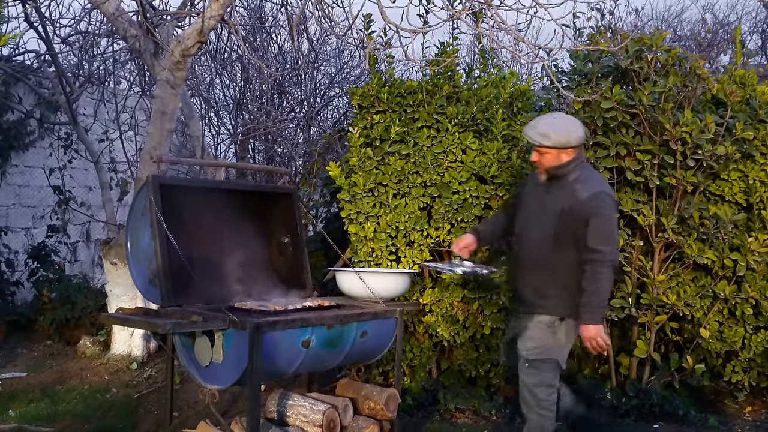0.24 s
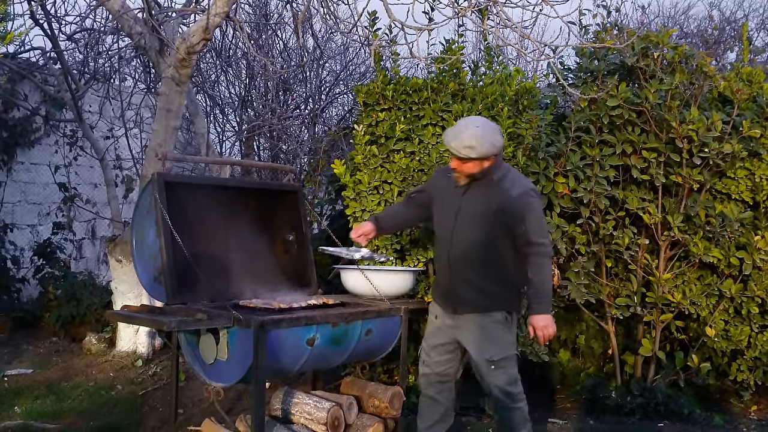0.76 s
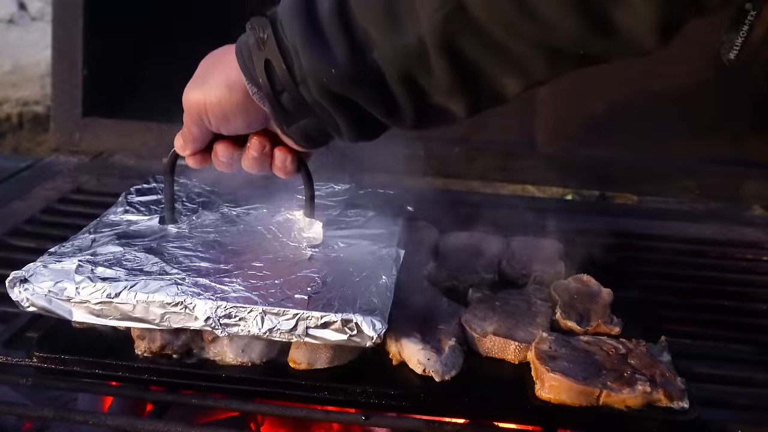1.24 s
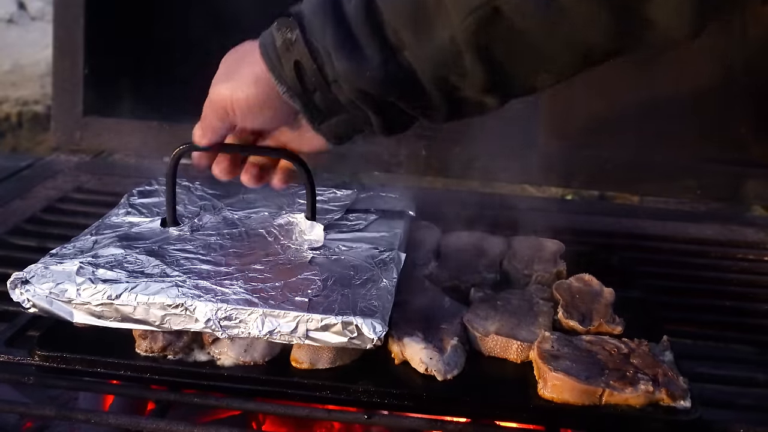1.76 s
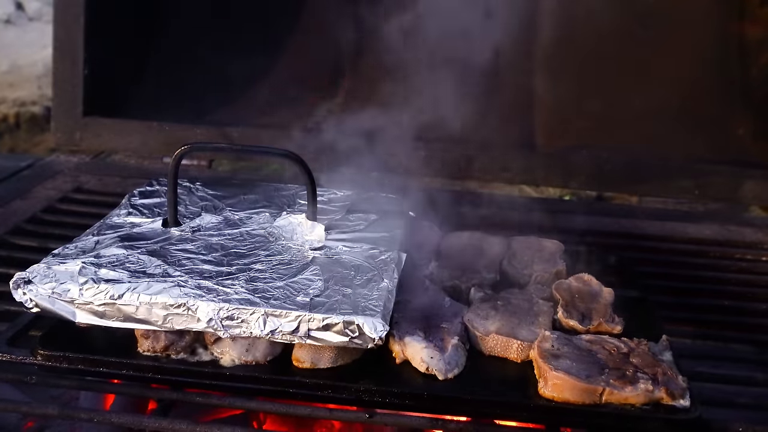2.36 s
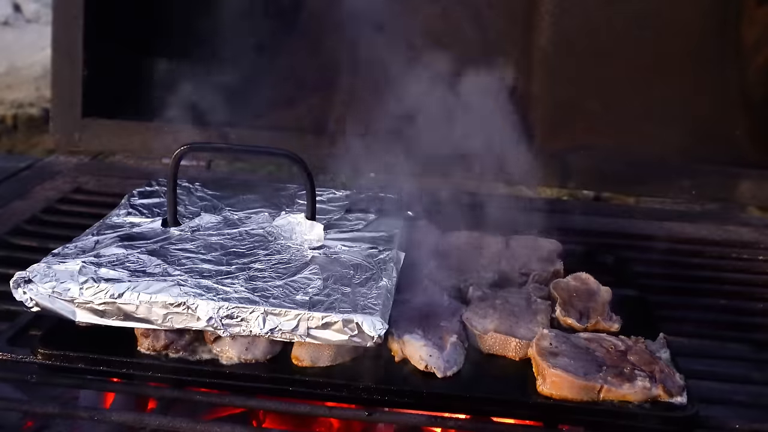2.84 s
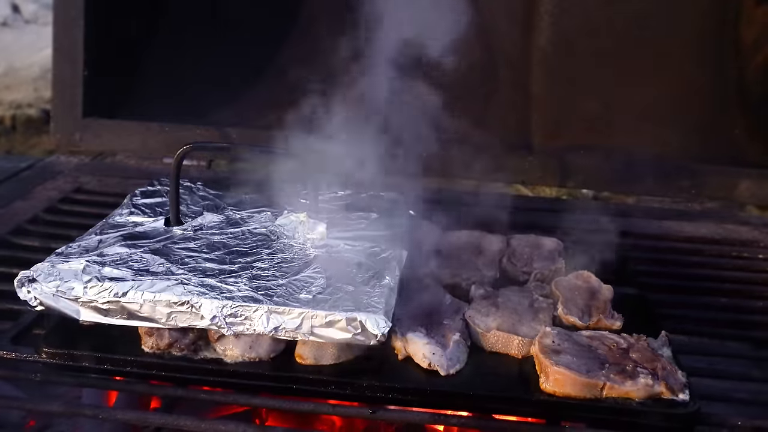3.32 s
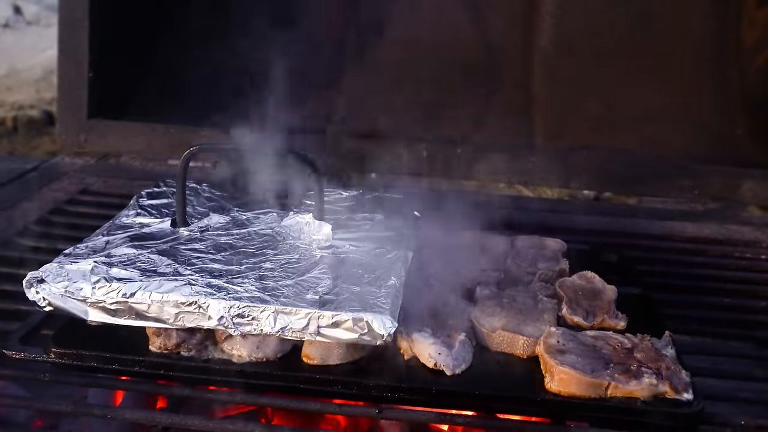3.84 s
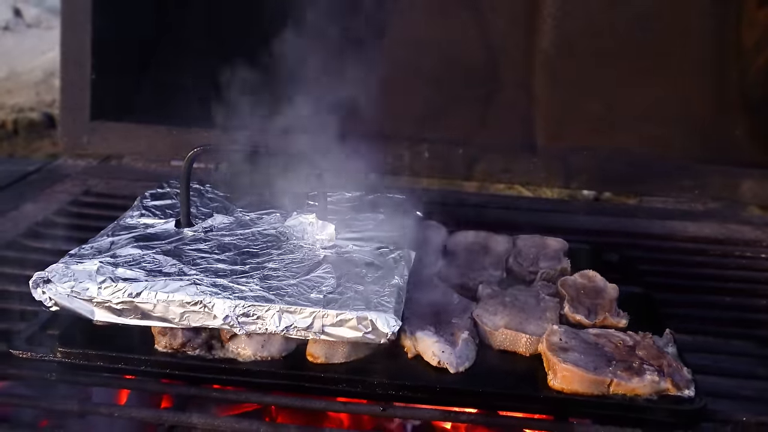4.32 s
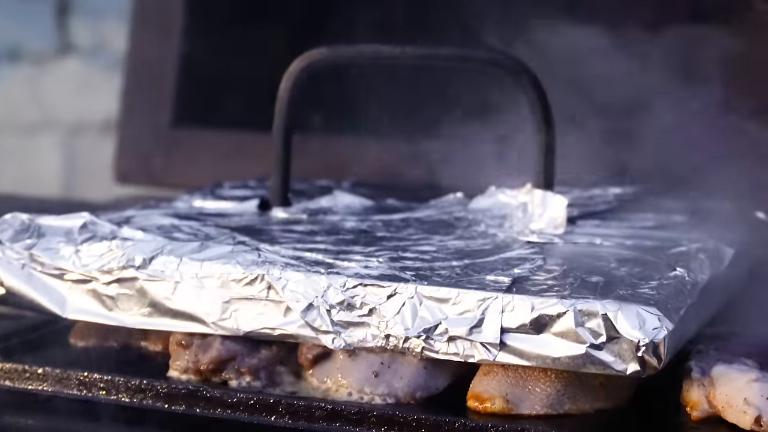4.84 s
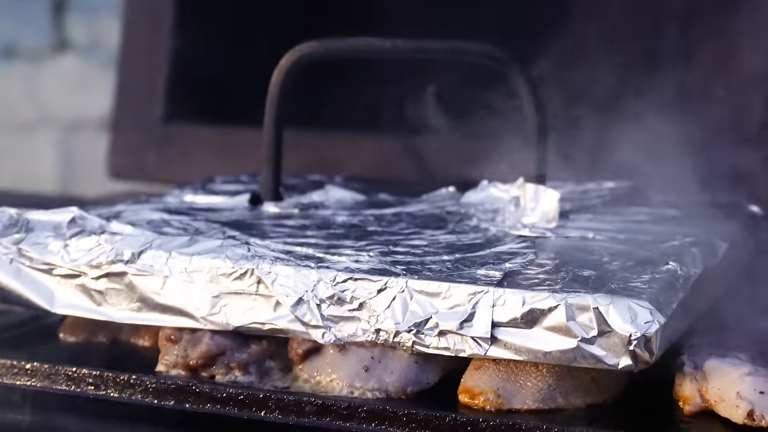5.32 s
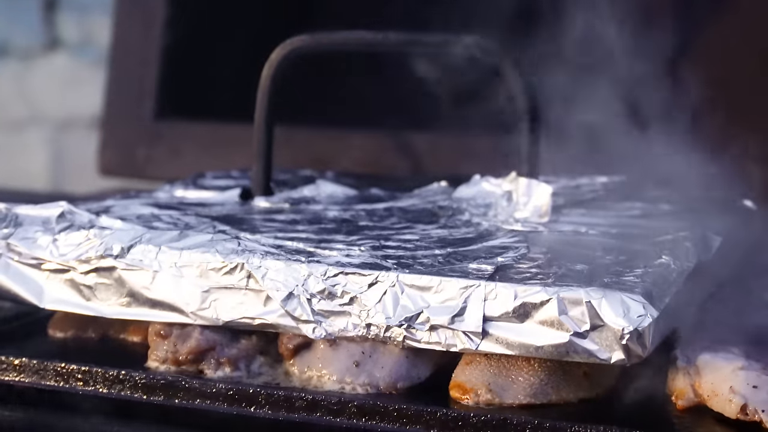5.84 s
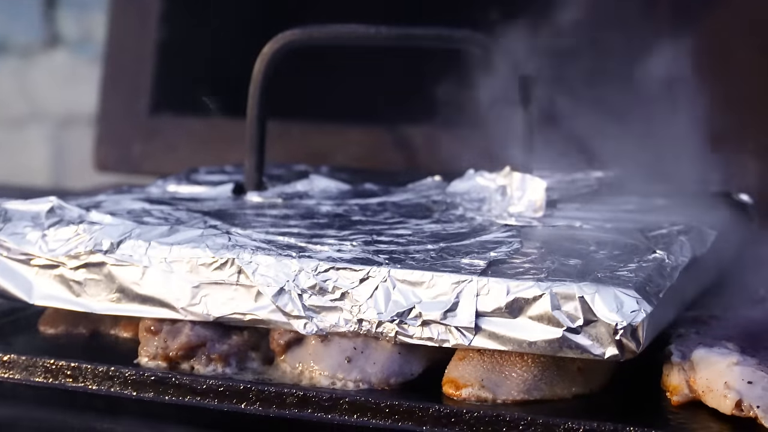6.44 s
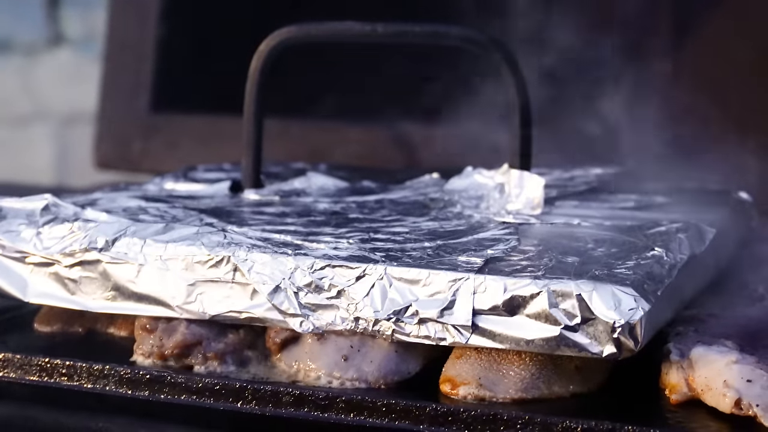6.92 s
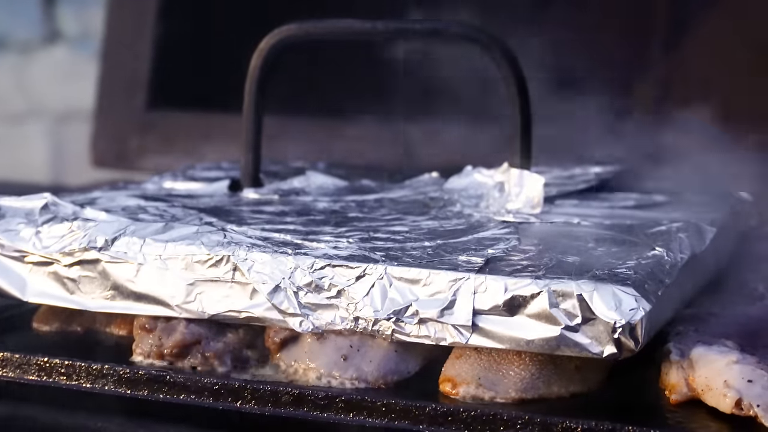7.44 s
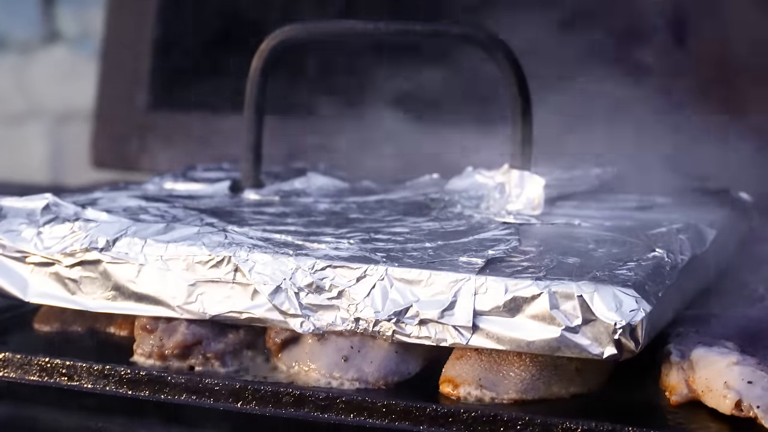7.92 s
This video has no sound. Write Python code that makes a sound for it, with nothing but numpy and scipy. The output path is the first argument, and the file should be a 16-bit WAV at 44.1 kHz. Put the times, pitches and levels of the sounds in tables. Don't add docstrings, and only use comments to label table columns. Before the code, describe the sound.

Outdoors, the first half second is quiet: a weak, distant sizzle over a soft low murmur. From about 0.6 s it swells fast, and by 1.3 s a close, bright, crisp frying hiss fills the foreground. At 1.1 s a press settles on the meat, thickening the mid tones and adding a barely audible narrow hum until about 3.9 s. A cluster of hard snaps comes at 1.3 to 1.6 s, and a very loud double crack at 2.8 s. Muffled thuds and drum blows gather around 3 to 3.7 s. From 4.7 s the perspective is closer and slightly softer, with frequent dry spits, ticks and pops, notably at 5.1, 5.6, 6.2 to 7 and 7.2 to 7.5 s, a few knocking the hollow steel. Around 8 s a low, soft flare roar rises beneath. Single close microphone, loud pops briefly ducking and clipping.

```python
import sys
import numpy as np
from scipy import signal
from scipy.fft import rfft, irfft
from scipy.io import wavfile
from scipy.ndimage import uniform_filter1d, map_coordinates

SR = 44100
rng = np.random.default_rng(int(sys.argv[2]) if len(sys.argv) > 2 else 0)


def gain_from_db(level_db):
    decades = np.asarray(level_db, float) / 20
    return 10 ** decades


def persist_wave(psi):
    counts = np.round(np.clip(psi, -1, 1) * 32767).astype(np.int16)
    wavfile.write(sys.argv[1], SR, np.atleast_2d(counts).T)


N = 360297

# time [s], sizzle level [dB].
BOIL = [(0, -41), (.37, -42.5), (.6, -39), (.85, -31.5), (1.13, -26.5), (1.3, -24.5), (2.07, -24),
        (2.6, -25), (2.95, -26), (3.73, -24.5), (4.36, -27), (4.66, -26), (5.2, -27), (5.77, -26),
        (6.07, -27), (6.6, -27), (7.6, -28), (8.17, -29.5)]
# frequency [Hz], gain [dB].
CRACK_SPECTRUM = [(30, -54), (300, -23), (1200, -1.5), (2500, -0.5), (6500, 3), (9000, -0.5), (17000, -13)]
PRESS_S, PRESS_RISE_S = 1.11, 0.055


def unit(x):
    return x / np.sqrt(np.mean(x ** 2) + 1e-20)


def curves(rows):
    s, *cols = np.transpose(rows)
    return [np.interp(np.arange(N) / SR, s, c) for c in cols]


def wobble(rate_hz):
    knots = rng.standard_normal(int(N * rate_hz / SR) + 4)
    return map_coordinates(knots, [np.arange(N) * rate_hz / SR])


def step(s, rise_s):
    return (1 + np.tanh((np.arange(N) / SR - s) / rise_s)) / 2


def coloured(x, points):
    size = 2 ** 13
    f, db = np.transpose(points)
    hz = np.fft.rfftfreq(size, 1 / SR)
    gain = gain_from_db(np.interp(np.log(hz + 1), np.log(f + 1), db))
    cepstrum = irfft(np.log(gain))
    cepstrum[1:size // 2] *= 2
    cepstrum[size // 2 + 1:] = 0
    impulse = irfft(np.exp(rfft(cepstrum)))[:size // 2]
    return signal.fftconvolve(x, impulse)[:N]


def peak(points):
    return np.abs(coloured(np.arange(N) == 0, points)).max()


def garden():
    # frequency [Hz], level [dB per Hz].
    murmur = [(15, -6), (25, -6), (60, -8), (110, -16), (200, -10), (300, -12), (345, -1), (420, -10),
              (1000, -42)]
    # time [s], level [dB].
    far_level = [(0, -67), (.6, -62.5), (1.3, -74), (8.17, -90)]
    level_db = curves(far_level)[0] + 2 * wobble(3.8)
    return gain_from_db(level_db) * unit(coloured(rng.standard_normal(N), murmur))


def fire():
    # frequency [Hz], level [dB per Hz].
    rumble = [(15, -10), (25, 7.5), (50, -10), (110, 1.5), (200, -4.5), (400, -21)]
    # frequency [Hz], level [dB per Hz].
    flare = [(20, -40), (100, -19), (190, -2), (300, -2), (500, -3), (900, -5), (3000, -53)]
    embers_db, flare_s, flare_rise_s, flare_db = -69.5, 8.0, 0.089, -44
    draught_db = embers_db + 1.9 * wobble(3.61) + 1.5 * wobble(8.7)
    embers = gain_from_db(draught_db + 2.5) * unit(coloured(rng.standard_normal(N), rumble))
    roar = step(flare_s, flare_rise_s) * gain_from_db(flare_db + 2.5 * wobble(25))
    return embers + roar * unit(coloured(rng.standard_normal(N), flare))


def note():
    note_hz, width_hz, note_db, end_s = 778, 18, -55, 3.87
    b, a = signal.iirpeak(note_hz, note_hz / width_hz, SR)
    ring = unit(signal.lfilter(b, a, rng.standard_normal(N)))
    gate = step(PRESS_S, PRESS_RISE_S) * (1 - step(end_s, 0.2))
    return gain_from_db(note_db + 2.5 * wobble(6)) * ring * gate


def knocks():
    # time [s], frequency [Hz], level [dB], decay by 60 dB [s].
    drum_knocks = [(3.091, 130, -44, .05), (3.639, 258, -31, 0.06), (4.21, 60, -50, .04), (6.63, 260, -44, 0.13),
                   (6.981, 278, -29.5, 0.067), (6.99, 424, -42, 0.48), (7.212, 50, -36, 0.037),
                   (7.2135, 595, -23, 0.0074), (7.2127, 1470, -10, 0.0098), (7.369, 141, -38, 0.051),
                   (7.37, 260, -36, 0.056)]
    t = np.arange(SR // 4) / SR
    out = np.zeros(N + SR)
    for s, hz, db, t60_s in drum_knocks:
        drift = np.cumsum(0.032 * rng.standard_normal(len(t)))
        ring = np.sin(2 * np.pi * hz * t + drift)
        attack = 1 - np.exp(-t / 0.0011)
        out[round(s * SR):][:len(t)] += gain_from_db(db - 60 * t / t60_s) * ring * attack
    return out[:N]


def ticks():
    # time [s], peak [dB].
    clear_ticks = [(1.0843, -6), (1.362, -7.9), (1.3996, -9), (1.5105, -8.0), (1.7771, -7.3),
                   (2.2931, -7.1), (2.434, -10), (2.4772, -10), (4.1822, -8.6), (4.2538, -8.7),
                   (4.9809, -9.6), (4.9955, -8.2), (5.1712, -6), (5.3315, -10), (5.4413, -12), (5.588, -5),
                   (5.6766, -9.3), (5.8588, -9.6), (5.8686, -9.0), (6.0794, -8.1), (6.2957, -6),
                   (6.4812, -6), (6.5792, -12), (6.636, -7.4), (6.6798, -12), (6.7458, -9.5),
                   (6.9563, -8.1), (6.9763, -8.4), (7.5624, -4), (7.8639, -10.6)]
    # frequency [Hz], gain [dB].
    spectrum = [(30, -70), (1000, -17), (3000, -1), (7000, 1), (11000, -4), (17000, -13)]
    gain_db, rate_hz, over_sizzle_db, scatter_db = -0.5, 30, 10, 2.5
    size_db = curves(BOIL)[0] + over_sizzle_db + np.minimum(scatter_db * rng.exponential(1, N), 9)
    spikes = (rng.random(N) < rate_hz / SR) * gain_from_db(size_db)
    s, db = np.transpose(clear_ticks)
    spikes[np.round(s * SR).astype(int)] = gain_from_db(db + gain_db)
    return coloured(spikes * rng.choice([-1, 1], N), spectrum) / peak(spectrum)


def cracks():
    # time [s], low ring [Hz], its level [dB], high ring [Hz], its level [dB].
    bursts = [(2.8208, 2780, -4, 3900, -6), (2.8239, 2150, 0, 6650, -15), (2.9298, 2500, -16, 3500, -11),
              (2.9337, 1700, -16, 3500, -15), (3.841, 2560, -13, 5800, -8), (4.211, 3300, -17, 5170, -7),
              (4.4036, 2500, -18, 6200, -12), (4.6496, 2020, -15.5, 4290, -18),
              (4.8368, 2320, -8, 6370, -19), (5.1497, 1510, -16, 4200, -11), (5.9325, 2350, -18, 4560, -9),
              (5.981, 2650, -16, 4850, -18), (6.229, 2500, -10, 4850, -9), (7.2135, 2370, -7.5, 5600, -13),
              (7.3677, 1200, -21, 5070, -9.5), (7.375, 2190, -8.5, 5200, -16),
              (7.5032, 2800, -11.5, 5240, -21), (7.901, 2600, -7, 5600, -7.5),
              (7.9046, 2400, -11, 6100, -15), (8.1236, 3450, -13.5, 5400, -9)]
    life_cycles = 3.1
    t = np.arange(SR // 4) / SR
    out = np.zeros(N + SR)
    for s, low_hz, low_db, high_hz, high_db in bursts:
        mean_hz = np.average([low_hz, high_hz], weights=gain_from_db([low_db, high_db]))
        life_ms = life_cycles * 1e3 / mean_hz
        hold = np.exp(-(t / (0.0013 * life_ms)) ** 2)
        tail = 0.1 * np.exp(-t / 0.0026) * rng.standard_normal(len(t))
        low = gain_from_db(low_db) * (hold * np.sin(2 * np.pi * low_hz * t) + tail)
        drift = np.cumsum(0.36 * rng.standard_normal(len(t)))
        high = gain_from_db(high_db) * hold * np.sin(2 * np.pi * high_hz * t + drift)
        out[round(s * SR):][:len(t)] += low + high
    return coloured(out[:N], CRACK_SPECTRUM)


def bubbles():
    # time [s], peak [dB], ring [Hz], thump [dB].
    fat_pops = [(.8998, -10, 3490, -32), (1.2803, -5, 1970, -30), (1.3094, 0, 2320, -28),
                (1.3448, -4, 3070, -37), (1.4426, -3, 2780, -32), (2.3085, -15, 3600, -31),
                (2.798, -4, 2130, -22), (2.8202, 0, 2470, -15), (2.9367, -15, 2990, -30),
                (2.993, -17, 3280, -21), (3.114, -5, 3300, -34), (3.642, -7, 2940, -32),
                (3.6692, -5, 3100, -24), (4.2599, -5, 6200, -31), (4.535, -8, 3860, -30),
                (4.7185, -4.5, 2530, -29), (4.773, -4, 4530, -33), (4.995, -16, 5140, -37),
                (5.1536, -2.5, 3540, -30), (5.5256, -4.5, 3620, -29), (5.9476, -7, 5500, -36),
                (6.498, -4.5, 2980, -34), (6.6354, -3, 4820, -28.5), (6.8318, -6, 2430, -25),
                (6.8341, -3.5, 3090, -37), (6.9368, -6, 3810, -34), (7.372, -6, 7500, -34),
                (7.5032, -8, 2620, -39), (7.884, -6, 3000, -29), (6.6315, -10, 4530, -40)]
    # time [s], peak [dB], ring [Hz].
    spits = [(3.99, -4.5, 3000), (1.581, -3, 5370), (2.273, -7, 4030), (2.6139, -8, 5130),
             (2.947, -11, 2640), (4.0716, -4, 4750), (4.2005, -6, 3560), (4.2533, -10, 3400),
             (4.4085, -5, 6000), (5.05, -9, 3940), (7.291, -13, 5500), (4.59, -8, 5200), (5.663, -5, 3800),
             (5.7596, -8, 3020), (5.845, -7, 4150), (5.977, -11, 3720), (7.2882, -12, 7000),
             (6.232, -4, 3250), (6.3695, -4.5, 3590), (6.3747, -5, 3670), (6.544, -11, 3670),
             (6.509, -6, 4700), (6.7113, -6.5, 5170), (6.9165, -6, 5100), (7.063, -7, 3960),
             (7.577, -7, 4980), (7.7049, -5.5, 4700), (7.888, -3, 5000), (7.978, -9, 5150),
             (8.0217, -9, 3990)]
    # time [s], thump [dB].
    thuds = [(.4955, -44), (.7078, -31), (1.1782, -36), (1.406, -36), (2.072, -26), (2.6383, -28.5),
             (2.93, -26), (2.9328, -25), (3.0555, -31), (3.2178, -26), (3.263, -26), (3.432, -26.5),
             (3.6381, -27), (4.182, -25), (7.279, -34), (4.625, -26.5), (4.6467, -26), (4.8365, -32),
             (5.1498, -27), (5.6862, -32), (5.981, -21.5), (5.9846, -31), (6.2108, -32), (6.445, -34),
             (6.981, -28), (7.2137, -29), (7.368, -23.5), (7.3808, -35), (7.905, -27), (8.1242, -19.5)]
    pop_cycles, spit_cycles, thud_cycles = 0.72, 0.88, 1.1
    spit_thump_db, thud_hz, thud_over_db = -41, 3000, 5
    rows = [(s, db, hz, thump_db, pop_cycles * 1e3 / hz) for s, db, hz, thump_db in fat_pops]
    rows += [(s, db, hz, spit_thump_db, spit_cycles * 1e3 / hz) for s, db, hz in spits]
    for s, thump_db in thuds:
        crack_db = min(thump_db + thud_over_db, -17)
        rows.append((s, crack_db, thud_hz, thump_db, thud_cycles * 1e3 / thud_hz))
    return np.transpose(rows)[:, :, None]


def pops():
    # frequency [Hz], gain [dB].
    thump = [(20, -45), (120, -14.5), (200, -8.5), (258, 2.5), (330, -6), (430, 2.5), (700, 2.5),
             (1200, 1.5), (3000, -13)]
    # frequency [Hz], gain [dB].
    snap = [(30, -70), (1000, -14), (2500, 0), (8000, 0), (11000, -9), (17000, -13)]
    t = np.arange(512) / SR
    s, db, hz, thump_db, life_ms = bubbles()
    at = np.round(s * SR).astype(int)
    shape = (len(s), len(t))

    def placed(waves):
        return np.bincount((at + np.arange(len(t))).ravel(), waves.ravel(), N + SR)[:N]

    fade = np.exp(-t / (0.00079 * life_ms))
    ring = 0.89 * np.sin(2 * np.pi * hz * t) * fade
    splatter = 0.28 * rng.standard_normal(shape) * fade ** 0.15 * np.minimum(life_ms / 0.48, 1)
    crack = placed(gain_from_db(db) * (ring + splatter))
    push = rng.standard_normal(shape) * np.exp(-t / 0.0029) + 11 * (t == 0)
    push /= np.linalg.norm(push, axis=1, keepdims=True)
    blows = placed(gain_from_db(thump_db + 15.0) * push)
    front = 0.8 * (1 - np.minimum(life_ms, 0.7)) * gain_from_db(db)
    fronts = np.bincount(at.ravel(), front.ravel(), N)
    out = coloured(crack, CRACK_SPECTRUM)
    out = out + coloured(blows, thump) / peak(thump)
    return out + coloured(fronts, snap) / peak(snap)


def levels():
    open_db, closed_db, dries_db_per_s = -8.5, -4.5, 0.57
    drum_far_db, drum_open_db, drum_pressed_db, drum_fades_db_per_s = -57, -24.5, -20, 0.74
    fizz_db, = curves(BOIL)
    pressed = step(PRESS_S, PRESS_RISE_S)
    since_s = np.maximum(np.arange(N) / SR - PRESS_S, 0)
    cavity_db = fizz_db + open_db + pressed * (closed_db - open_db) - dries_db_per_s * since_s
    drum_db = fizz_db + drum_open_db + pressed * (drum_pressed_db - drum_open_db)
    drum_db = np.maximum(drum_db - drum_fades_db_per_s * since_s, drum_far_db)
    return fizz_db, cavity_db, drum_db


def sizzle():
    # time [s], steady share of the sizzle [0-1], size scatter [dB], spray [dB].
    seats = [
        (0, 0.52, 3.5, -7),
        (.58, 0.43, 3.5, -7),
        (.7, 0.59, 5, -6.5),
        (4.6, 0.61, 5, -7),
        (4.8, 0.6, 4.5, -7),
        (8.17, 0.39, 6, -7),
    ]
    # frequency [Hz], level [dB per Hz].
    film_spectrum = [(30, -84), (1000, -36), (2500, -7.5), (3500, -4), (5000, -1.5), (6800, -0.5),
                     (7800, -2), (9000, -12), (12000, -32.5)]
    spray_spectrum = [(30, -90), (4000, -31), (8000, -5.5), (9500, 0.5), (12500, -4.5), (13700, -9.5),
                      (14800, -5.5), (17000, -3.5)]
    cavity_spectrum = [(30, -96), (500, -40.5), (1100, -11), (1800, -5.5), (2600, 0.5), (3000, -3),
                       (3600, -17.5), (6000, -22)]
    drum_spectrum = [(20, -54), (120, -18.5), (200, -13.5), (258, -1.5), (320, -8), (430, -5), (480, -3),
                     (570, 1.5), (710, -1.5), (780, 1.5), (900, -3), (1400, -3.5), (3000, -30)]
    fizz_db, cavity_db, drum_db = levels()
    steady, scatter_db, spray_db = curves(seats)
    clumps = gain_from_db(1.2 * wobble(30) + 3 * wobble(170))
    bursts = rng.random(N) < 2000 / SR * clumps
    size_db = scatter_db * rng.exponential(1, N)
    share = np.clip(steady, 0, 1)

    def body(points, own_db, swell_db):
        click_db = np.minimum(size_db + own_db * rng.standard_normal(N), 20)
        clicks = unit(bursts * gain_from_db(click_db))
        hiss = unit(rng.standard_normal(N) * clumps ** 0.047 * gain_from_db(swell_db * wobble(20)))
        return unit(coloured(np.sqrt(1 - share) * clicks + np.sqrt(share) * hiss, points))

    film = gain_from_db(fizz_db - 0.92) * body(film_spectrum, own_db=4.0, swell_db=0.82)
    spray = gain_from_db(fizz_db + spray_db) * body(spray_spectrum, own_db=5, swell_db=1.25)
    cavity = gain_from_db(cavity_db - 1.03) * body(cavity_spectrum, own_db=4.5, swell_db=1.16)
    drum = gain_from_db(drum_db + 1.5) * body(drum_spectrum, own_db=7.5, swell_db=2.0)
    return film + spray + cavity + drum


def lid(x):
    # delay [ms], level [dB].
    answers = [(1.7, -30), (3.9, -26), (7.7, -23)]
    tail_t60_s, tail_db, hop = 0.068, -9.0, 32
    copies = sum(gain_from_db(db) * np.pad(x, (round(ms * SR / 1000), 0))[:N] for ms, db in answers)
    z = signal.stft(x, nperseg=128, noverlap=128 - hop)[2]
    keep = gain_from_db(-60 * (hop / SR) / tail_t60_s) ** 2
    power = signal.lfilter([0, 0, 1 - keep], [1, -keep], np.abs(z) ** 2, axis=1)
    power[0] = 0
    grain = signal.stft(rng.standard_normal(N), nperseg=128, noverlap=128 - hop)[2]
    grain = grain / np.sqrt(np.mean(np.abs(grain) ** 2))
    tail = signal.istft(np.sqrt(power) * grain, nperseg=128, noverlap=128 - hop)[1]
    return x + copies + gain_from_db(tail_db) * tail[:N]


def scene():
    plate = lid(sizzle() + pops() + cracks() + knocks() + ticks())
    mono = plate + fire() + garden() + note()
    return np.array([mono, mono])


def top_cut(x):
    return signal.sosfilt(signal.butter(12, 16920, fs=SR, output="sos"), x)


def record(dry):
    low_hz, top_hz, ceiling_db, threshold_db, recovery_db_per_s = 12, 15750, -6.6, -17, 130
    hz = np.fft.rfftfreq(N, 1 / SR)
    band = (hz > low_hz) & (hz < top_hz)
    power = np.abs(uniform_filter1d(dry[0] ** 2, size=90))
    over_db = np.clip(10 * np.log10(power + 1e-12) - threshold_db, 0, 8)
    creep_db = recovery_db_per_s * np.arange(N) / SR
    duck_db = np.maximum.accumulate(0.85 * over_db + creep_db) - creep_db
    late_db = uniform_filter1d(np.pad(duck_db, (220, 0))[:N], size=160)
    x = irfft(rfft(dry) * band, N) * gain_from_db(-late_db)
    x = x / (1 + np.abs(x / gain_from_db(ceiling_db)) ** 6) ** (1 / 6)
    return top_cut(irfft(rfft(x) * band, N))


dry = scene()
out = record(dry)
persist_wave(out)
```